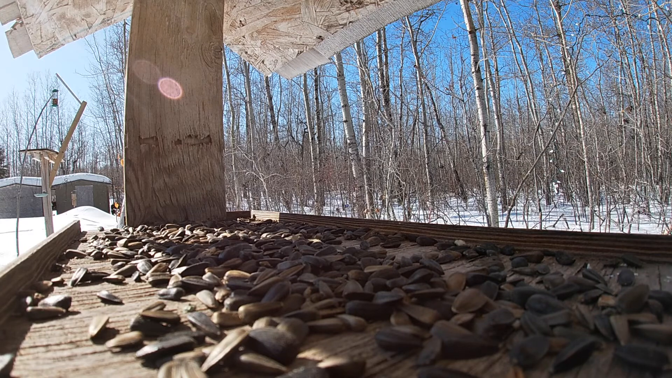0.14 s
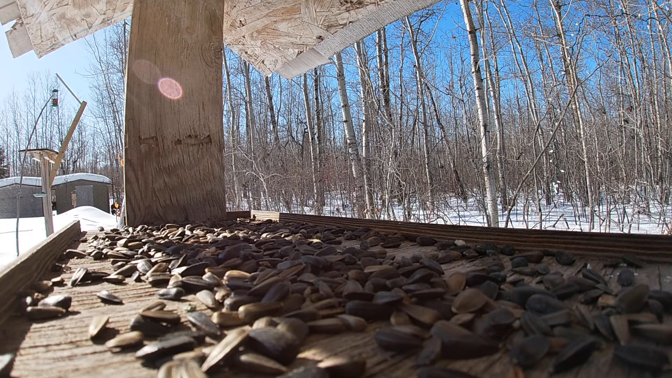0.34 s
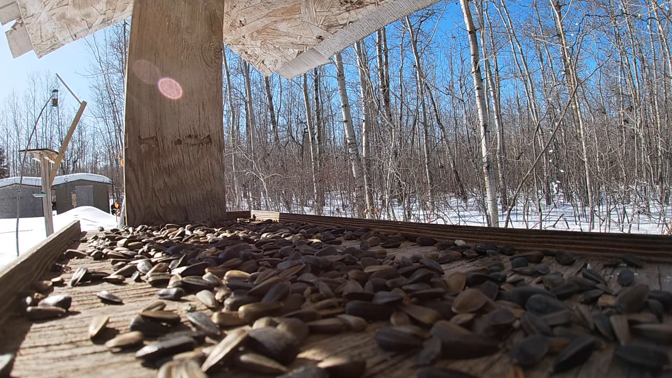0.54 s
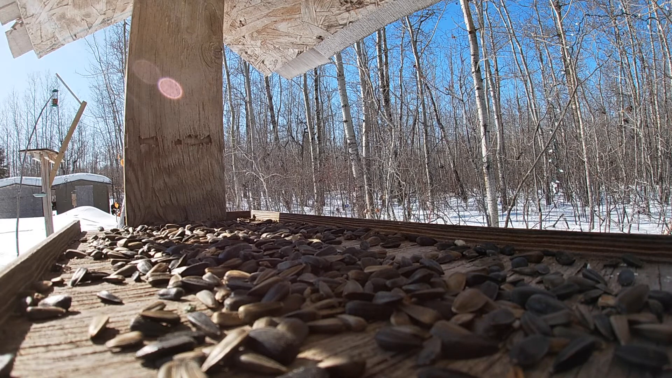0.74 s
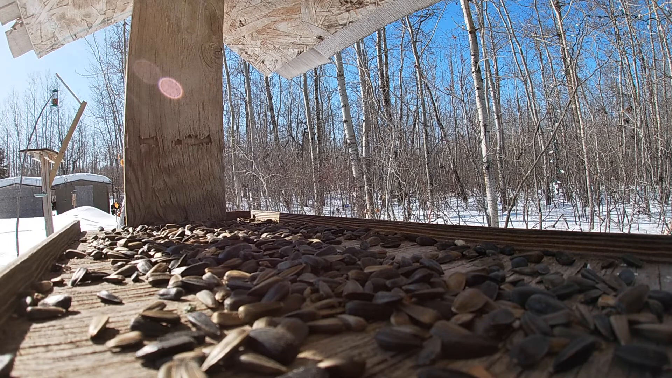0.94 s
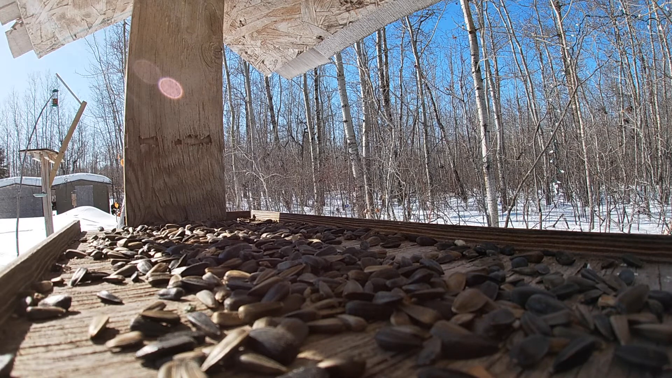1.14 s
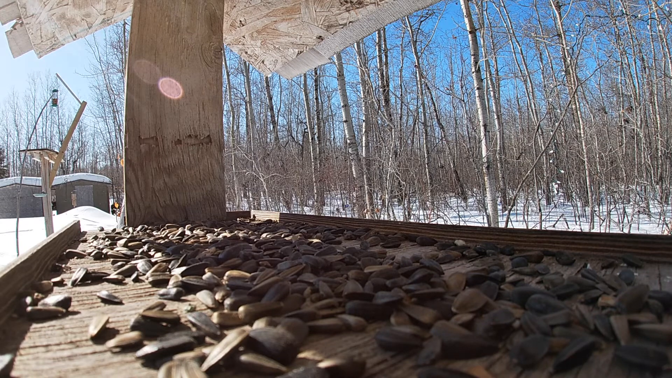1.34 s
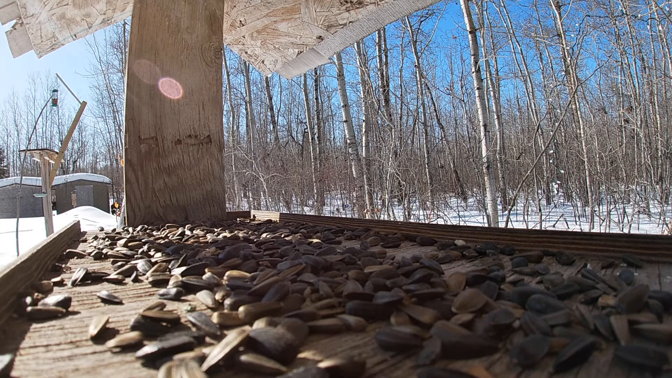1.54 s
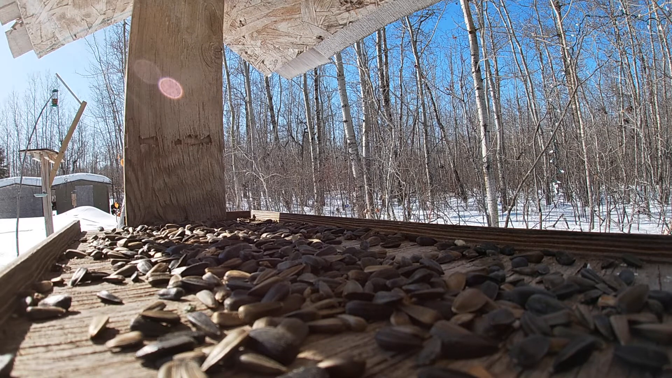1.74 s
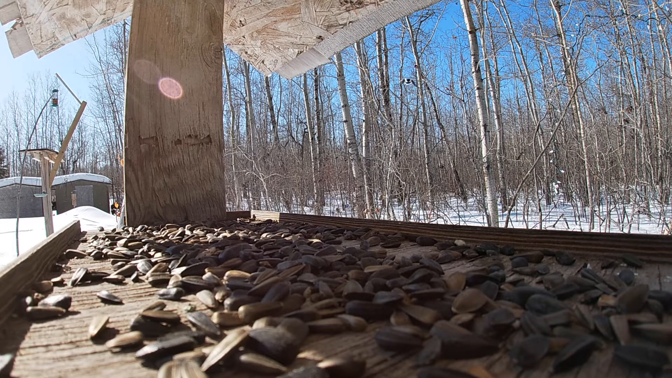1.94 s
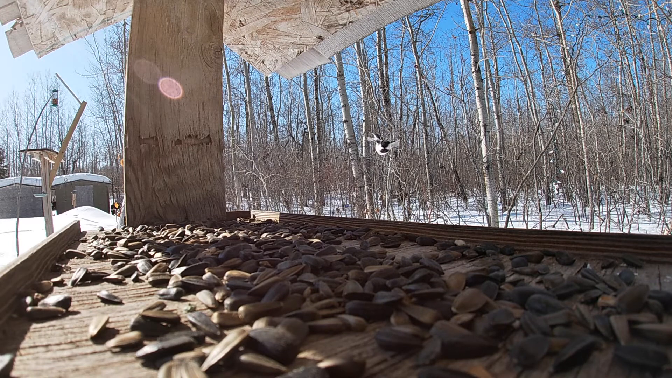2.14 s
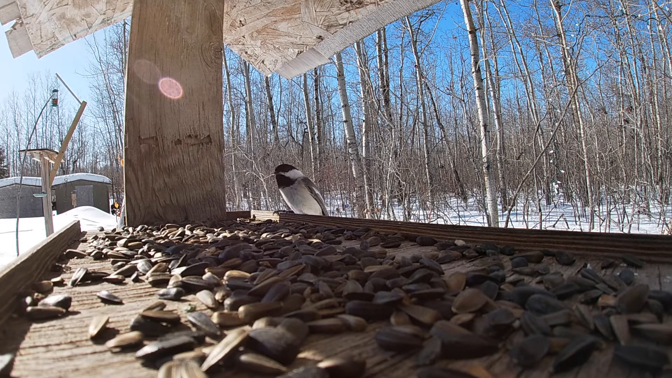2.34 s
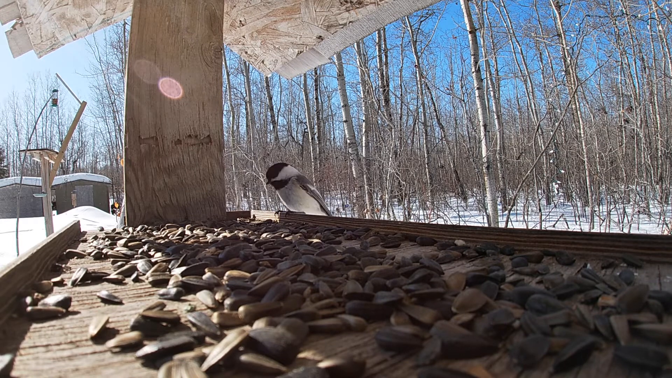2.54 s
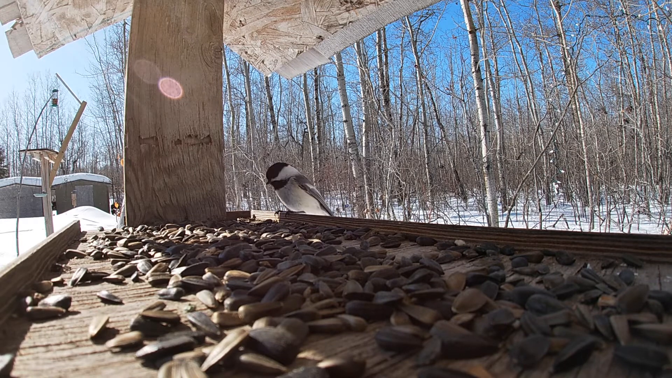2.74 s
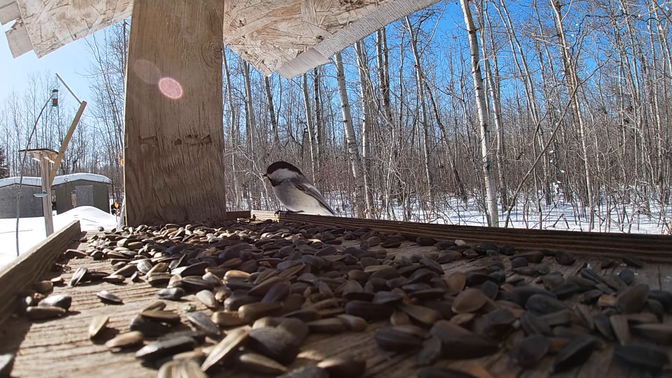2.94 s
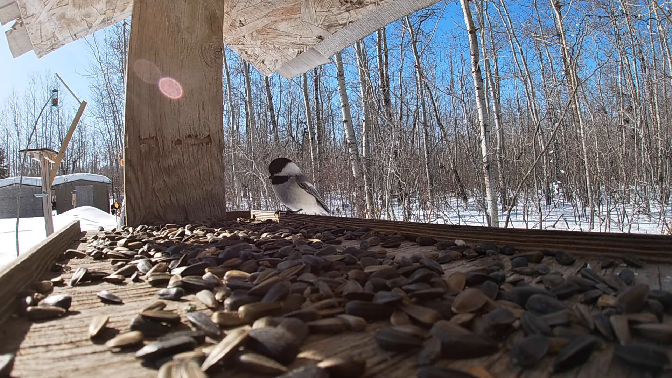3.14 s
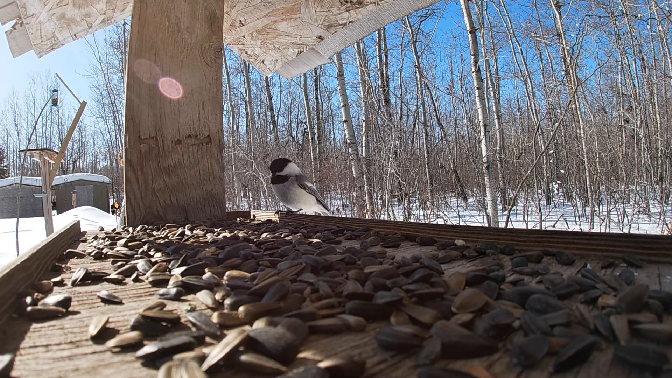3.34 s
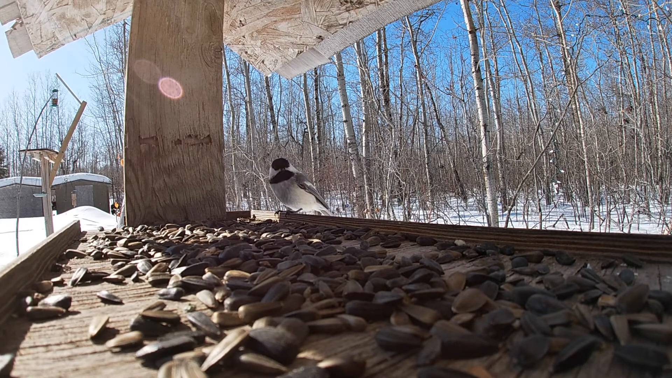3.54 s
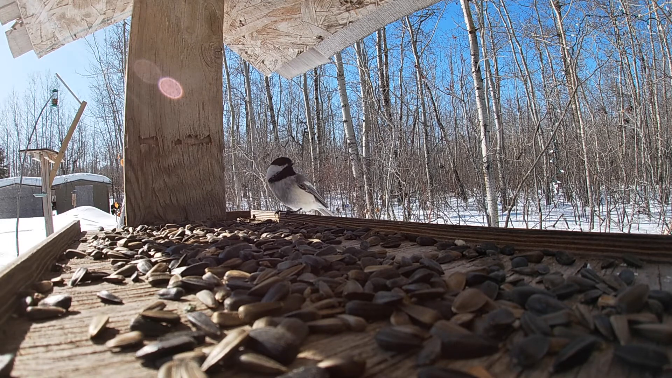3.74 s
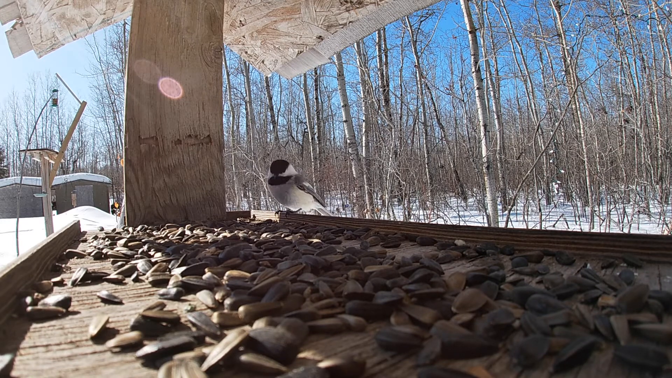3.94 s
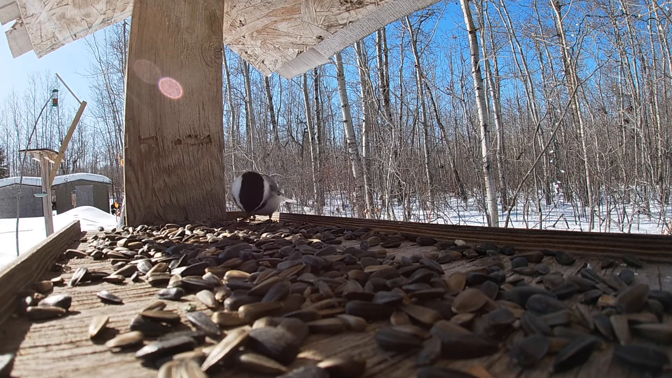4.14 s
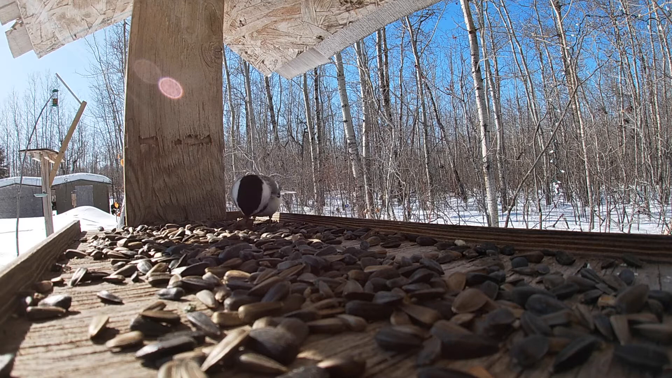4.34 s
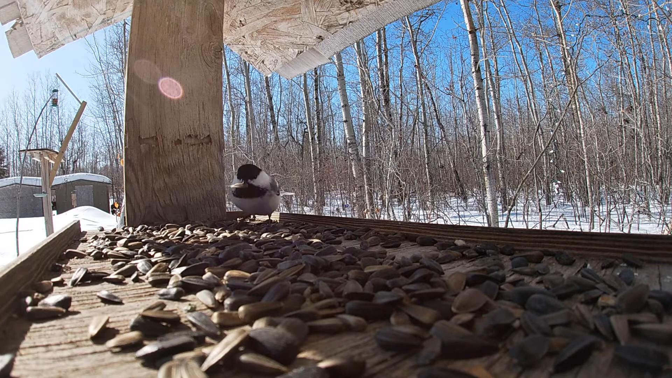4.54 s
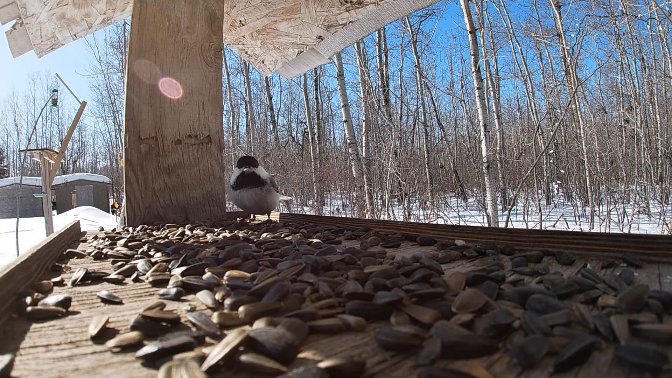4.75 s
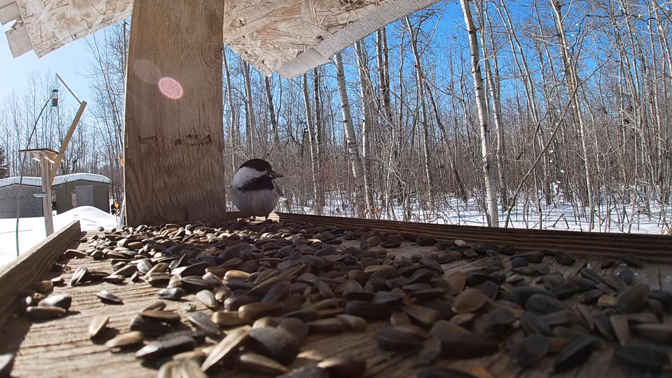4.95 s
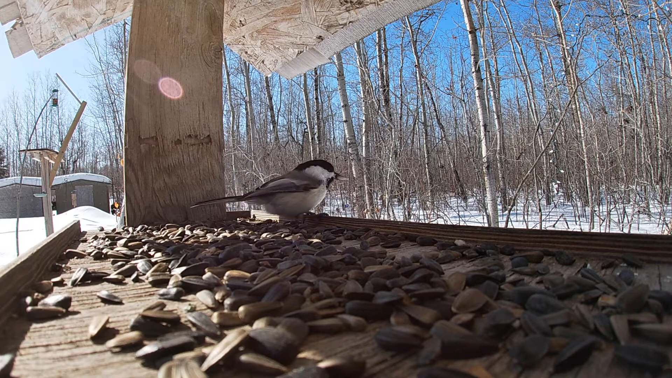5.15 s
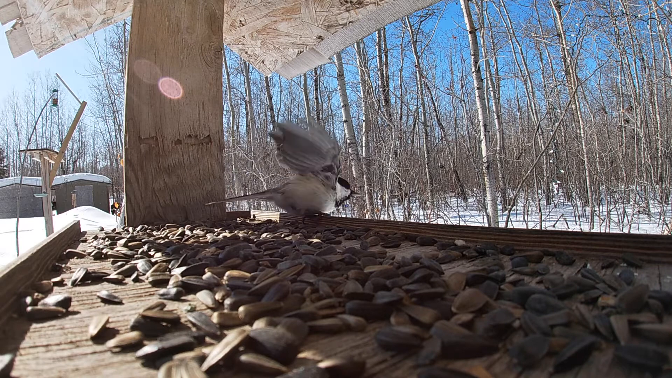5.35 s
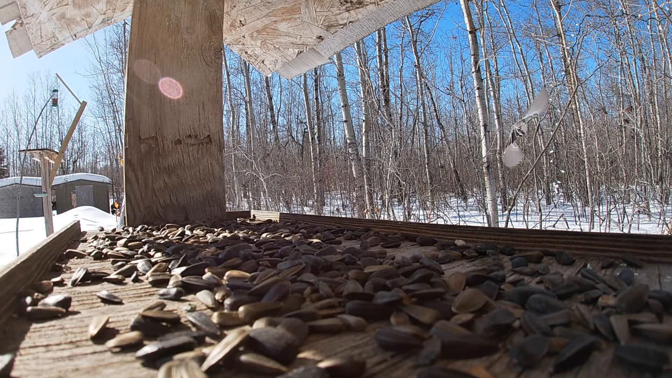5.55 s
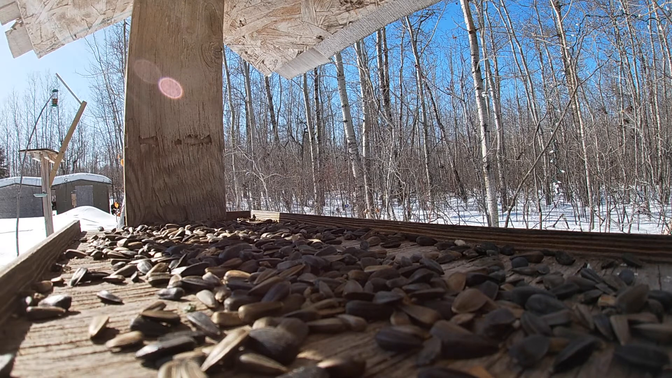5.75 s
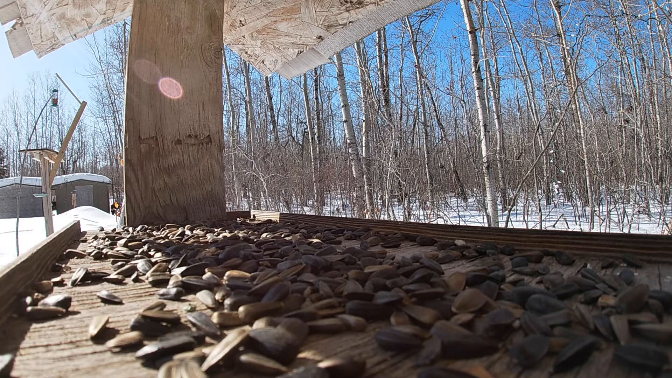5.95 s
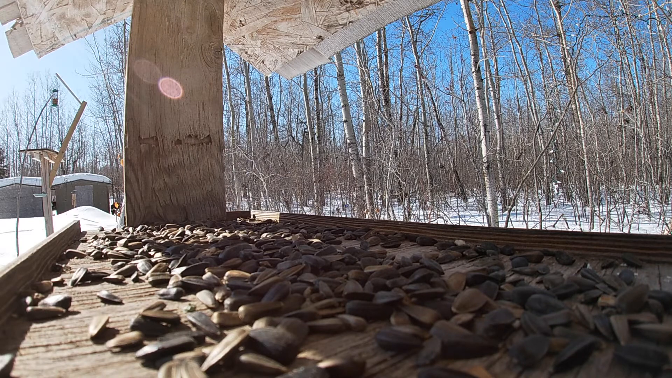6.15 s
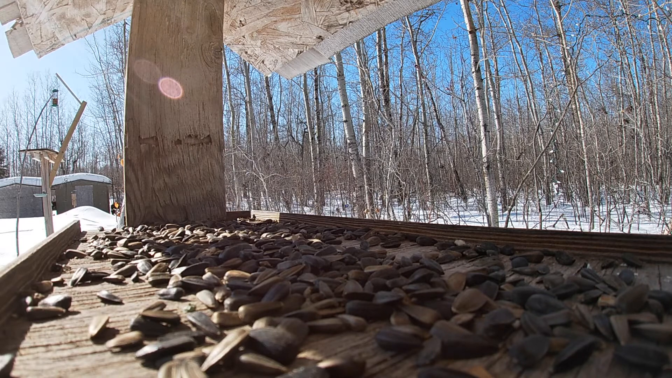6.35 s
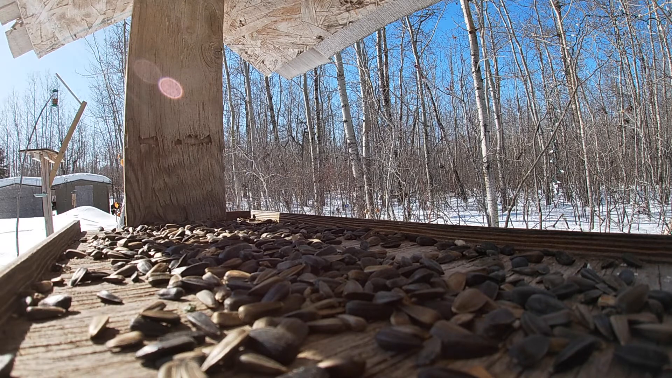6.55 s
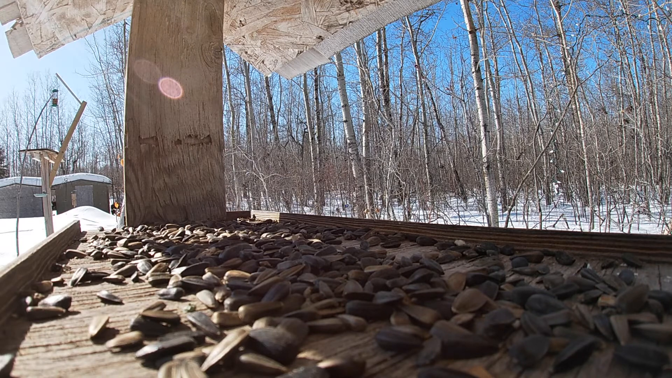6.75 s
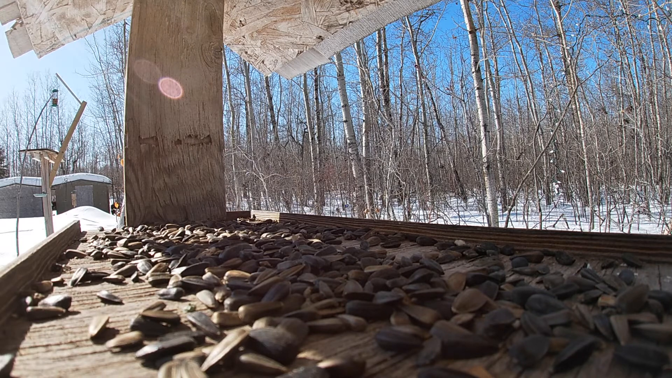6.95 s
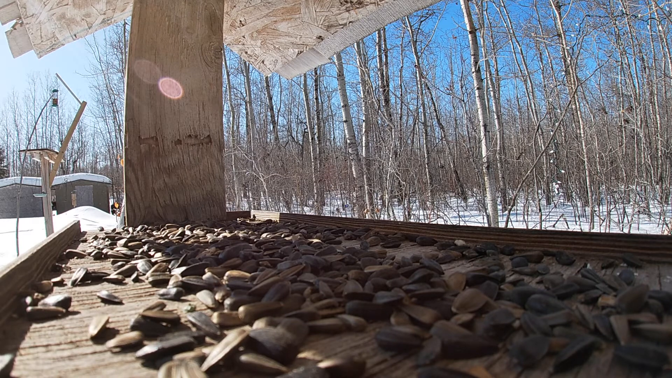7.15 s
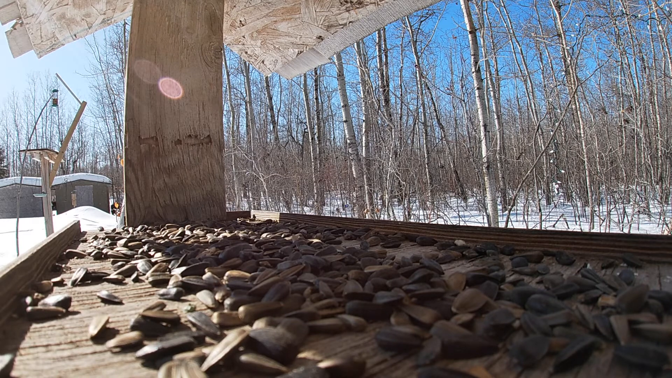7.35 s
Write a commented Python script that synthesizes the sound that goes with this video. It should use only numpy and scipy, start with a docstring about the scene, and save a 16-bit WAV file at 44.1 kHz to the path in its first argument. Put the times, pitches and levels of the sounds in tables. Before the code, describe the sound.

A quiet winter yard is heard from a microphone on a wooden feeder tray, with faint distant road noise and a soft low thump of wind at the start. At about 2 seconds a small bird gives a thin, very high chirp and flutters in. Its wings snap close by, and at 2.3 seconds its claws clatter onto the wood with a small thud. A lull follows with a few faint ticks. From 4 to 4.4 seconds it hops, scratching the tray and cracking seed shells, then its beak ticks lightly on a husk until 4.9. Around 5 seconds come more sharp pattering steps and cracks. At 5.4 it pushes off in a quick, close whir of wingbeats that fades within half a second. Another faint chirp sounds near 5.9 seconds, leaving light wind, a few tiny ticks and far traffic until about 7.5 seconds.

```python
"""Light wind thumps the microphone over far road noise in a winter yard. A small bird whistles, brakes on
its wings, lands on a wooden feeder tray, hops, husks a seed, flies off and whistles again.
The microphone sits on the tray: claws ring the wood's modes, each wing stroke pushes air and slaps
feathers, seed shells crack underfoot, the beak ticks on a husk and the feeder sways on its mount."""
import sys
import numpy as np
from scipy import signal
from scipy.fft import rfft, irfft, next_fast_len
from scipy.io import wavfile
from scipy.ndimage import map_coordinates

SR = 44100
rng = np.random.default_rng(int(sys.argv[2]) if len(sys.argv) > 2 else 0)


def to_wav(sig):
    """Store sig (one row per channel, or 1-D mono) as 16-bit WAV at the path in sys.argv[1].

    Samples outside -1..1 are clipped; the rate is SR.
    """
    pcm = np.clip(np.atleast_2d(sig), -1, 1) * 32767
    pcm = np.round(pcm).astype(np.int16)
    wavfile.write(sys.argv[1], SR, pcm.T)  # frames by channels


N = 330377
TIME_S = np.arange(N) / SR

# Claws and seeds on the tray. Each row: start in seconds, level in dB, knock and bright offsets in dB,
# knock centre in Hz, scratch centre in Hz, slide in seconds.
CONTACTS = [(2.3163, -17, 0.5, -6, 946, 2320, 0.00039), (2.3179, -15, 1.5, -4.5, 1110, 2200, 0),
            (2.321, -18.5, 0.5, -10.5, 950, 1920, 0.00045), (2.3334, -26, -7, -7.5, 580, 1540, 0),
            (2.3375, -27, 0, -2.5, 643, 3490, 0.00027), (2.3586, -40.5, 14.5, -3, 472, 2270, 0.0011),
            (2.39, -25.5, 4, -12.5, 1020, 1530, 0.00067), (2.3954, -37, -7, 0, 670, 1560, 0),
            (2.412, -30, 0, -13, 970, 2290, 0), (2.4211, -33, -4, -9, 653, 1570, 0),
            (2.4244, -37, 8, -13, 950, 1540, 0.0029), (2.4787, -45.5, 6, -19, 930, 2300, 0.0014),
            (2.5097, -41, 12.5, -7.5, 900, 1610, 0.0011), (4.007, -52.5, 15.5, -23, 950, 1540, 0.0032),
            (4.0343, -40, -2, -19, 920, 1530, 0), (4.0443, -39, 2, -14, 865, 2140, 0.0033),
            (4.0988, -19, -26, -17.5, 1170, 1720, 0.00063), (4.105, -26.5, -7, -4.5, 895, 3220, 0.00047),
            (4.112, -24.5, -2.5, -7.5, 1080, 3470, 0.0004), (4.132, -21, -10, -16.5, 1070, 1860, 0.0015),
            (4.171, -27.5, -9, -21, 1130, 1770, 0.0001), (4.1793, -26, -8, -32.5, 1170, 1510, 0.0019),
            (4.2655, -24.5, -3.5, -9.5, 1380, 1530, 0.00013), (4.2752, -31.5, -1, -11, 692, 2310, 0.0017),
            (4.3, -41, -2, -14, 409, 1610, 0.000066), (4.3154, -35, -9, -25.5, 428, 1530, 0.00085),
            (4.347, -29, -4, -4, 1300, 2356, 0.00098), (4.9626, -43.5, 3.5, -24, 1140, 1770, 0.0045),
            (4.9872, -28.5, -14, -6.5, 1110, 1740, 0.005), (5.0255, -36.5, -2, -20, 1110, 3520, 0.0069),
            (5.033, -27, -14, -16, 1170, 3480, 0.00077), (5.041, -25.5, -12, -4.5, 1170, 3630, 0.00037),
            (5.0587, -40, -4, -23, 1230, 1520, 0.0004), (5.081, -21, -5.5, -11, 1245, 1820, 0.000011),
            (5.091, -21, -28, -33, 1400, 2640, 0.00028), (5.097, -22, -7, -7.5, 1280, 2640, 0),
            (5.1016, -16.5, -7.5, -24, 1277, 1420, 0.0021), (5.118, -40.5, 8.5, -12, 664, 1540, 0.0065),
            (5.1247, -27, -12, -33, 1390, 2620, 0), (5.1307, -24.5, -10, -20, 935, 1550, 0.00039),
            (5.1539, -26, -6, -7, 1230, 2190, 0.00016), (5.171, -50.5, 8, -21, 934, 2260, 0.032),
            (5.191, -28, -1.5, -9.5, 930, 2140, 0.00025), (5.216, -43.5, 4.5, -15, 630, 2220, 0.002),
            (5.249, -29.5, -2, -11, 690, 2020, 0.0002), (5.2614, -49.5, 13, 1, 660, 1520, 0.00029),
            (5.2737, -45, -16, -5.5, 620, 1470, 0), (5.2924, -22, -6, -12.5, 950, 1880, 0.00077),
            (5.337, -38, -5, -30, 977, 1880, 0.0024), (5.3538, -33, -1.5, -14, 1230, 1890, 0.0028),
            (5.368, -33, -12, -32, 877, 2220, 0.001), (5.3792, -16, -0.5, -13, 1150, 1580, 0.00049),
            (5.3944, -33, -4, -30.5, 616, 1520, 0.011), (5.407, -21, 0.5, -8.5, 653, 1450, 0.0022),
            (5.4254, -24.5, -4.5, -17, 625, 2200, 0.00024), (5.4334, -26, -24.5, -3, 958, 2320, 0.00025)]
# Body weight coming down. Each row: start in seconds, level in dB, centre in Hz.
FOOTFALLS = [(2.334, -21, 410), (2.3577, -30, 302), (2.3951, -37, 298), (2.4271, -40, 398),
             (2.5124, -61, 302), (4.1115, -36, 290), (4.2643, -27, 333), (4.275, -36.5, 400),
             (4.347, -41, 315), (5.034, -61.5, 300), (5.081, -29, 228), (5.1177, -35.5, 262),
             (5.1579, -38.5, 256), (5.1919, -36, 206), (5.2911, -39, 200), (5.424, -36, 249),
             (5.4329, -33.5, 302)]
# Tray resonances. Each row: centre in Hz, width in Hz, gain in dB at landing, hop and take-off.
TRAY_MODES = [(85, 3, 5, -6, -18), (152.7, 11, -4.5, -4, -3.5), (191.5, 26.7, -8, -6.5, -4),
              (313, 19.4, -6.5, -1.5, 0.5), (441, 37, -3.5, -7, -2), (660, 27.6, 3.5, -2.5, 0),
              (780, 58, -10, -3.5, -5), (950, 105, -3.5, -4, -3), (1210, 67, -2, -4, -3),
              (1530, 77, -6, -3, -1.5), (1855, 53, -10.5, -4, -4), (2270, 112, -2, -7, -3),
              (2980, 650, -14.5, -10, -13.5), (3480, 130, -2, -1.5, -4.5), (4200, 99, -25, -32, -23),
              (5140, 120, -2.5, -3, -4.5), (6330, 340, -17, -22, -20), (8100, 117, -41, -13.5, -13.5)]
# Wing strokes of approach, braking and jump. Each row: time in seconds, flick, downwash and slap levels
# in dB, length factor (braking above 1.15).
STROKES = [(2, -51, -63, -50.5, 1.21), (2.04, -46, -51, -48.5, 1.1), (2.2262, -46, -37, -31, 1.25),
           (2.2659, -30, -25, -28.5, 1.55), (2.308, -33, -27.5, -72, 0.9), (5.389, -42, -28.5, -37.5, 1.08),
           (5.4249, -42, -23.5, -35, 1.07)]
# Brushing as the bird moves. Each row: full-level time, 60 dB rise, hold and 60 dB fall in seconds,
# level in dB.
BRUSHES = [(2.0, 0.3, 0.089, 0.37, -60), (2.293, 0.28, 0.0069, 0.059, -36), (2.32, .05, 0.024, 0.8, -61),
           (4.03, 0.32, 0.014, 0.44, -55.5), (4.11, 0.11, 0.03, 0.23, -47), (4.176, .03, .017, .06, -52),
           (4.2, .05, 0.023, .2, -57.5), (4.29, 0.185, 0.04, 0.37, -49.5), (4.986, 0.093, 0.049, 0.31, -49),
           (5.07, 0.44, 0.075, 0.22, -52), (5.2, .3, .13, .5, -59.5), (5.37, 0.25, 0.042, .2, -46.5),
           (5.47, 0.22, 0.043, 0.62, -45)]
# Soft rustles and swishes; the last is the bright edge of something passing far off. Rows as in BRUSHES.
SWISHES = [(.175, 0.1, 0.065, 0.3, -69.5), (2.236, .03, .07, .1, -64), (4.99, 0.094, 0.049, 0.17, -50.5),
           (5.44, .2, 0.081, 0.89, -57), (6.58, .15, 0.23, 0.99, -66)]
# Shells underfoot. Each row: start in seconds, level in dB, pitch in Hz.
SHELL_CRACKS = [(4.1, -23, 1900), (4.1064, -14.5, 3220), (4.1719, -18, 3300), (4.266, -21.5, 1530),
                (5.033, -43, 3300), (5.0818, -26, 1610), (5.2933, -22.5, 1510), (5.0927, -13, 2720),
                (5.0972, -16, 2600), (5.1038, -14, 2350), (5.1249, -16, 2740)]
# Dry ticks. Each row: start in seconds, level in dB.
HUSK_TICKS = [(1.43, -58.5), (2.748, -59), (2.768, -57), (3.314, -55.5), (3.826, -57.5), (3.926, -53.5),
              (4.404, -46), (4.459, -47.5), (4.522, -45), (4.569, -64), (4.6185, -45.5), (4.674, -46.5),
              (4.748, -47.5), (4.784, -60.5), (4.845, -43), (4.8644, -49.5), (5.953, -55), (5.9788, -54),
              (6.313, -56.5), (6.792, -59)]
THIN_TICKS = [(.155, -65), (.255, -63.5), (0.647, -61), (1.33, -62.5), (4.161, -53), (4.291, -57),
              (4.3155, -56), (5.119, -53), (5.306, -56)]
# Contact calls. Each row: start and climb in seconds, top in Hz, level in dB, overtone offset in dB,
# level change over the drop in dB, start pitch over top pitch, exponent that flattens the climb.
CHIRPS = [(1.984, .04, 7060, -48.5, -23, -5, .7, 1.8), (5.917, .0415, 6820, -51, -33, -17, .74, 1.8),
          (.17, .012, 4050, -67, -50, -30, .68, 1.6)]
# Swells. Each row: full-level time, hold and 60 dB fall in seconds, level in dB.
SWAYS = [(2.313, 0.059, 0.4, -33), (2.4247, 0.28, 1.24, -44.5), (4.1, .01, 1.5, -47.5),
         (5.714, 0.033, 0.6, -49.5)]  # feeder after a push
PASSES = [(.98, 1.2, 8, -63), (2.92, 0.1, 2.59, -59), (3.9, 1, 6, -66), (5.95, 0.032, 1.5, -65.5),
          (6.582, 0.24, 1.6, -58), (7, 0.54, 3.4, -64)]  # something passing far off
# Wind on the microphone. Each row: time in seconds, level in dB.
BREEZE = [(0, -61.5), (.9, -57), (1.05, -80), (1.3, -70.5), (2.6, -70), (2.95, -55), (3.1, -66), (3.4, -77),
          (3.75, -65), (4.5, -67.5), (5.8, -68), (6.1, -63.5), (6.4, -77), (6.55, -57.5), (6.8, -71),
          (7, -77.5), (7.49, -71)]
# Gusts. Each row: full-level time and hold in seconds, level in dB.
GUSTS = [(0, 0.028, -44.5), (.15, 0.05, -37.5), (.21, 0.167, -53.5)]
# Far drones. Each row: centre in Hz, distance to -60 dB in Hz, level in dB.
DRONES = [(1277, 94, -75.5), (1520, 48, -77.5)]

# Spectra. Each row: frequency in Hz, relative level in dB.
SCRATCH_EQ = [(60, -31), (300, -10.5), (1000, -19.5), (4000, 0.5), (9000, -7.5), (13000, -30), (16000, -65)]
SLAP_EQ = [(200, -120), (500, -13), (1500, 8.5), (3000, -1), (5000, -12.5), (9000, -21.5), (14000, -23.5),
           (16000, -120)]
SNAP_EQ = [(300, -120), (800, -2), (1600, -4.5), (2800, 6), (4200, -3), (6000, -15), (10000, -20.5),
           (14000, -38), (16000, -120)]
BRUSH_EQ = [(150, -120), (350, 3), (700, -2.5), (1500, 0), (3300, -12.5), (5000, -17.5), (9000, -23.5),
            (14000, -36), (16000, -120)]
WIND_EQ = [(12, -16), (28, 1), (60, -21.5), (120, -22.5), (300, -39), (500, -120)]
GUST_EQ = [(15, -1.5), (40, 0.5), (110, -9.5), (220, -19), (400, -42.5), (600, -120)]
ROAD_EQ = [(53, -45), (90, -40.5), (113, -40), (139, -2.5), (167, 1.5), (216, -2), (379, -14), (600, -27.5),
           (780, -43.5), (1320, -120)]
RUSH_EQ = [(350, -120), (550, -17), (800, -2.5), (1300, 1), (2000, -0.5), (2900, -5), (3600, -10),
           (4300, -15.5), (5200, -29), (7000, -120)]
HISS_EQ = [(180, -32), (300, -3), (437, -8), (788, 2), (991, -1.5), (1250, -1), (1420, -1.5), (1540, -4),
           (1730, -15.5), (3730, -22), (5010, -9.5), (9960, -23), (12300, -32), (13200, -39.5),
           (15000, -57)]
MIC_EQ = [(20, -1.5), (12000, -2), (14000, -3), (15000, -12), (15600, -32)]
SIDE_EQ = [(250, -71.5), (500, -65), (1000, -80), (4000, -36.5), (9000, -30), (14000, -0.5)]
FLAP_EQ = [(150, -60), (280, 0), (450, 0), (700, -8.5), (1000, -57)]
WAKE_EQ = [(50, -32.5), (120, -2), (250, -2), (400, -19), (700, -60)]
TICK_EQ = [(1000, -53), (3500, -2.5), (6000, 0), (11000, -4.5), (15000, -31)]
HIGH_HISS_EQ = [(7500, -120), (8800, -5), (12000, -6), (14000, -15), (15000, -120)]

PERCH_SPANS_S = [(0, 3.5), (3.5, 4.9), (4.9, 8)]  # landing, hop, take-off
GRIP_RISE_S, GRIP_S, KNOCK_S, BRIGHT_LAG_S = 0.00009, 0.0038, 0.0047, 0.001001
DEPART_S, BEAT_S, DULL_S, DULL_HZ = 5.4588, 0.0376, 0.58, 4600
SNAP_S, SLAP_S, OPENING_S = 0.0013, 0.0019, 0.00031  # pulse widths
SHELL_TOP_HZ, HUSK_HZ, THIN_TICK_HZ = 6000, 4900, 9400
DROP_S, END_PITCH_RATIO, HIGH_HISS_FALL_S, TREES_T60_S = 0.008, 0.64, 0.33, 0.24
ROAD_DB, RUSH_FLOOR_DB, HISS_DB = -68.5, -68.5, -69
BAND_LIMIT_HZ = 15600


def claws():
    """Force of the feet on the tray: heavy contacts thud and knock, hard ones reach the treble."""
    thud, knock, scratch, bright = np.zeros((4, N))
    for s, db, knock_db, bright_db, knock_hz, scratch_hz, slide_s in CONTACTS:
        spray = burst(GRIP_S + 1.457 * slide_s, GRIP_RISE_S + slide_s, spiky_db=3, snap=8.9)
        early = spray * np.exp(-TIME_S[:len(spray)] / (KNOCK_S + slide_s))
        early *= np.linalg.norm(spray) / np.linalg.norm(early)
        add(thud, s, amp(db + knock_db - 11.5) * spray)
        add(knock, s, amp(db + knock_db) * (resonate(early, knock_hz, q=2.2) + 0.3 * early + 0.2 * spray))
        add(scratch, s, amp(db) * (resonate(spray, scratch_hz, q=2.2) + 0.3 * spray))
        add(bright, s + BRIGHT_LAG_S, amp(db + bright_db) * spray)
    for s, db, hz in FOOTFALLS:
        push = burst(0.0053, GRIP_RISE_S, spiky_db=3.5, snap=4.5)
        add(thud, s, amp(db + 2) * resonate(push, hz, q=1.5))
    return (amp(25.5) * filtered(thud, lambda hz: highpass(hz, 128) * lowpass(hz, 450) ** 2)
            + amp(18) * filtered(knock, lambda hz: highpass(hz, 537) * lowpass(hz, 1325) ** 2)
            + amp(14) * filtered(scratch, lambda hz: highpass(hz, 1550) * lowpass(hz, 3600))
            + amp(14.5) * filtered(bright, lambda hz: highpass(hz, 3750) ** 2))


def tray(force):
    """Each perch rings the wood's modes in its own balance; direct scratch fills between them."""
    def response(hz, perch):
        modes = sum((-1) ** k * amp(db[perch]) * 1j * hz * width / (centre**2 - hz**2 + 1j * hz * width)
                    for k, (centre, width, *db) in enumerate(TRAY_MODES))
        return modes + 0.21 * eq_gain(SCRATCH_EQ, hz)

    return sum(filtered(force * (TIME_S >= start_s) * (TIME_S < end_s), lambda hz: response(hz, perch))
               for perch, (start_s, end_s) in enumerate(PERCH_SPANS_S))


def departure():
    """Eight even beats fading with distance: rows as in STROKES, plus the opening tick in dB."""
    first_db, loss_db = np.array([(-16.5, -18, -31.5), (4.5, 5.5, 5)])  # flick, downwash, slap
    for k in range(8):
        glide_db = 12 * (k == 7)  # the glide cuts the last beat
        scatter_db = rng.normal(0, 1.1, 3) * (k > 1)
        levels_db = first_db - loss_db * k / (1 + 0.03 * k) - glide_db + scatter_db
        yield DEPART_S + k * BEAT_S, *levels_db, 0.97, -43.5 - k - 8 * (k > 5)


def wings_and_swishes():
    """Strokes flick, push air, suck it back and slap feathers; soft swishes share the snap's noise."""
    t = np.arange(-SR // 50, SR // 15) / SR

    def bump(at_s, width_s):
        return np.exp(-0.5 * ((t - at_s) / width_s) ** 2)

    air, slap, snap, flap = np.zeros((4, N))
    add(air, 2.307 + t[0], amp(-28) * bump(0, 0.0039))  # spread wings stop the bird in one push
    feathers = noise(SLAP_EQ)
    dull = filtered(feathers, lambda hz: 1 / (1 + (hz / DULL_HZ) ** 4))
    feathers += np.clip((TIME_S - DEPART_S) / DULL_S, 0, 1) * (dull - feathers)
    strokes = [(*row, row[3] - 25) for row in STROKES] + list(departure())
    for s, flick_db, wash_db, slap_db, length, opening_db in strokes:
        widen = 1 + 0.08 * max(s - DEPART_S, 0) / BEAT_S
        flick = bump(0, 0.0008 * widen) - 0.6 * bump(0.002 * widen, 0.0007 * widen)
        flick += 0.25 * bump(0.0046, 0.001) - 0.2 * bump(0.007, 0.0008)
        suction = bump(0.017 * length, 0.0024 * length) + 0.15 * bump(0.022 * length, 0.007)
        braking = length > 1.15
        if braking:  # the spread wing pushes at once; taut feathers snap
            push = 0.7 * bump(0.001, 0.0013) + 0.55 * bump(0.007, 0.004)
            closing = bump(0.0078, np.where(t < 0.0078, SNAP_S / 2, SNAP_S)) + 0.07 * bump(0.014, 0.0086)
        else:
            push = 0.25 * bump(-0.006, 0.003) + 0.25 * bump(0.004, 0.005) + 0.5 * bump(0.0095, 0.0014)
            closing = bump(0.0083, SLAP_S * widen) + 0.2 * bump(0.014, 0.0086)
        start_s = s + t[0]
        add(air, start_s, amp(flick_db) * flick + amp(wash_db) * (push - suction))
        add(snap if braking else slap, start_s, amp(slap_db) * closing)
        add(snap, start_s, amp(opening_db) * bump(-0.0052, OPENING_S))
        add(flap, start_s, amp(flick_db - 20) * bump(0.0042, 0.0037))
    brush = np.max([held(*row) for row in BRUSHES], axis=0) * amp(-6 + 5.2 * wobble(120))
    swish = sum(held(*row) for row in SWISHES) * amp(2.8 * wobble(90))
    wake = held(DEPART_S, 0.06, 0.018, 0.56, db=-42) * noise(WAKE_EQ)
    return (air + wake + slap * feathers + (snap + swish) * noise(SNAP_EQ)
            + flap * noise(FLAP_EQ) + brush * noise(BRUSH_EQ))


def shells():
    """Hard seed shells crack underfoot, each spent in about one and a half cycles."""
    cracks = np.zeros(N)
    for s, db, hz in SHELL_CRACKS:
        cycles = hz * TIME_S[:SR // 100]
        add(cracks, s, amp(db + 16) * cycles * np.exp(-2.6 * cycles) * np.sin(2 * np.pi * cycles))
    return filtered(cracks, lambda hz: 1 / (1 + (hz / SHELL_TOP_HZ) ** 6))


def beak():
    """Dry ticks, the loud ones from the beak on a husk: a broad crack with one resonance."""
    ticks = np.zeros(N)
    for rows, centre_hz in (HUSK_TICKS, HUSK_HZ), (THIN_TICKS, THIN_TICK_HZ):
        for s, db in rows:
            spray = burst(0.0037, 0.00067, spiky_db=1.5, snap=0)
            ring = resonate(spray, centre_hz * np.exp(rng.normal(0, 0.013)), q=3.5)
            add(ticks, s, amp(db + 3.5) * (ring + 0.3 * spray))
    return filtered(ticks, lambda hz: eq_gain(TICK_EQ, hz))


def calls():
    """Whistles of an unsteady syrinx climb and drop; a faint high hiss accompanies each and lingers."""
    voice, high_hiss = np.zeros(N), noise(HIGH_HISS_EQ)
    for s, climb_s, top_hz, db, overtone_db, drop_db, start_ratio, flatten in CHIRPS:
        up = np.clip((TIME_S - s) / climb_s, 0, 1)
        down = np.clip((TIME_S - s - climb_s) / DROP_S, 0, 1)
        climb = (1 - start_ratio) * (1 - (1 - up ** 0.7) ** flatten)
        drop = (1 - END_PITCH_RATIO) * (1 - (1 - down) ** 2)
        jitter = 1 + (0.0045 + 0.043 * down) * wobble(900)
        phase = 2 * np.pi * np.cumsum(top_hz * (start_ratio + climb - drop) * jitter) / SR
        whistle = np.sqrt(2) * (np.sin(phase) + amp(overtone_db) * np.sin(2 * phase))
        level = held(s + 0.3 * climb_s, 0.8 * climb_s, 0.7 * climb_s + DROP_S - 0.002, 0.012, db)
        hiss_level = held(s + climb_s / 4, climb_s, climb_s, HIGH_HISS_FALL_S, db + overtone_db - 1)
        voice += level * amp(drop_db * down ** 0.4) * whistle + hiss_level * high_hiss
    # an earlier whistle dies away at the start
    return voice + amp(-70.5 - 60 * TIME_S / 0.84) * noise([(5750, -40), (6050, 0), (6350, -40)])


def trees(voice):
    """The voice plus its short diffuse echo off the trees."""
    echo = rng.standard_normal(SR // 3) * amp(-60 * TIME_S[:SR // 3] / TREES_T60_S)
    return voice + amp(-20) * signal.fftconvolve(voice, echo / np.linalg.norm(echo))[:N]


def sway(hz=26.43, rise_s=0.023):
    """The feeder's mount rings low and long after a push."""
    return sum(held(s, rise_s, *rest) * np.sin(2 * np.pi * hz * (TIME_S - s)) for s, *rest in SWAYS)


def gusts(rise_s=0.044, fall_s=0.12):
    """Puffs of wind thump the microphone."""
    level = sum(held(s, rise_s, hold_s, fall_s, db) for s, hold_s, db in GUSTS)
    return level * amp(1.6 * wobble(30)) * noise(GUST_EQ)


def drones():
    """Two faint narrow drones far off; the upper one swells briefly."""
    lower, upper = (amp(db + 2 * wobble(2.23)) * noise([(hz - skirt, -60), (hz, 0), (hz + skirt, -60)])
                    for hz, skirt, db in DRONES)
    return lower + upper * (1 + held(5.8, 0.21, 0.26, 0.99, db=2.03))


def yard():
    """Wind, road hum, a far rush that swells as something passes, and hiss."""
    wind = amp(np.interp(TIME_S, *np.transpose(BREEZE)) + 3 * wobble(8))
    road = amp(ROAD_DB + 1.5 * wobble(12) + 2 * wobble(5))
    passing = np.max([held(s, 0.41, *rest) for s, *rest in PASSES], axis=0)
    rush = passing.clip(amp(RUSH_FLOOR_DB)) * amp(0.7 * wobble(11))
    return (wind * noise(WIND_EQ) + road * noise(ROAD_EQ) + rush * noise(RUSH_EQ)
            + amp(HISS_DB + 0.64 * wobble(4.9)) * noise(HISS_EQ))


def burst(length_s, rise_s, spiky_db, snap):
    """Lumpy noise of many tiny contacts with a weak tail; a sudden one opens with a snap."""
    t = TIME_S[:SR // 10]
    lumps = np.repeat(rng.standard_normal(len(t) // 16 + 1), 16)[:len(t)]
    decay = np.exp(-(t / length_s) ** 2) + 0.1 * np.exp(-t / (4.6 * length_s))
    shape = decay * (1 - np.exp(-t / rise_s))
    grit = amp(spiky_db * lumps) * shape * rng.standard_normal(len(t))
    grit *= np.linalg.norm(shape) / np.linalg.norm(grit)
    grit[2] += snap * np.exp(-rise_s / 0.001)
    return grit


def held(s, rise_s, hold_s, fall_s, db):
    """Gain that climbs 60 dB in rise_s up to time s, holds, then falls 60 dB in fall_s."""
    t = TIME_S - s
    ramp = np.minimum(t / rise_s, (hold_s - t) / fall_s).clip(max=0)
    return amp(np.maximum(db + 60 * ramp, -200))


def amp(db):
    return 10 ** (np.asarray(db) / 20)


def eq_gain(eq, hz):
    """Gain of a spectrum table, interpolated in dB over log frequency."""
    knots_hz, db = np.transpose(eq)
    return amp(np.interp(np.log(hz + 1), np.log(knots_hz + 1), db))


def lowpass(hz, corner_hz):
    return 1 / (1 + 1j * np.sqrt(2) * hz / corner_hz - (hz / corner_hz) ** 2)


def highpass(hz, corner_hz):
    return -(hz / corner_hz) ** 2 * lowpass(hz, corner_hz)


def resonate(x, hz, q):
    return signal.lfilter(*signal.iirpeak(hz, q, SR), x)


def filtered(x, response):
    """x through a complex frequency response."""
    size = next_fast_len(N + SR // 2)
    return irfft(rfft(x, size) * response(np.fft.rfftfreq(size, 1 / SR)), size)[..., :N]


def noise(eq):
    """Coloured noise of rms 1."""
    x = filtered(rng.standard_normal(N), lambda hz: eq_gain(eq, hz))
    return x / np.sqrt(np.mean(x ** 2) + 1e-20)


def wobble(knots_per_s):
    """Smooth random curve."""
    return map_coordinates(rng.standard_normal(int(N * knots_per_s / SR) + 4), [TIME_S * knots_per_s])


def add(track, s, sound):
    part = track[max(round(s * SR), 0):][:len(sound)]
    part += sound[:len(part)]


def scene():
    """One microphone feeds both channels."""
    background = gusts() + drones() + yard()
    foreground = wings_and_swishes() + tray(claws()) + sway() + shells() + beak() + trees(calls())
    return np.tile(background + foreground, (2, 1))


def record(dry):
    """Microphone colour and band limit; the channels part in phase, most in the treble."""
    side = filtered(dry[0], lambda hz: 1j * eq_gain(SIDE_EQ, hz))
    return filtered(dry + [side, -side], lambda hz: eq_gain(MIC_EQ, hz) * (hz < BAND_LIMIT_HZ))


dry = scene()
out = record(dry)
to_wav(out)
```